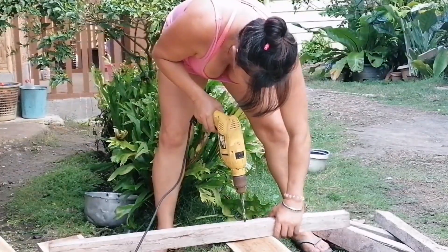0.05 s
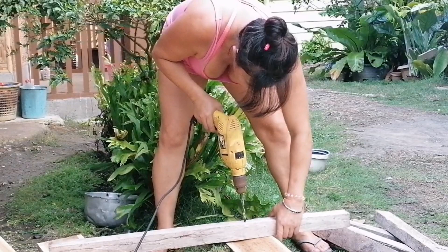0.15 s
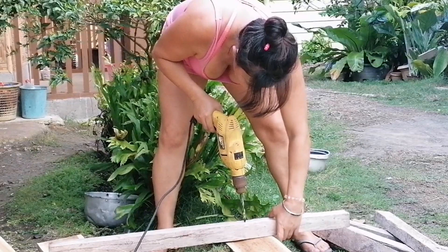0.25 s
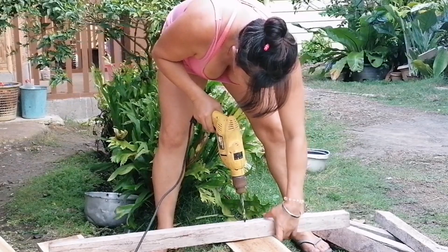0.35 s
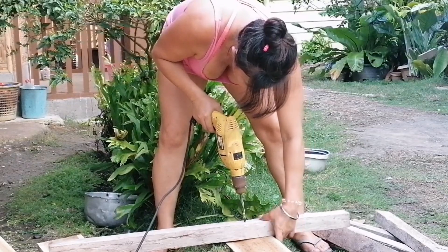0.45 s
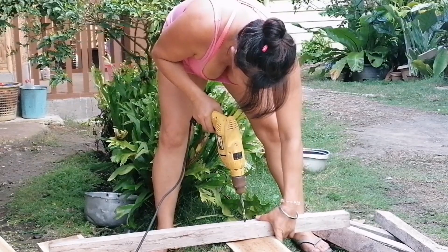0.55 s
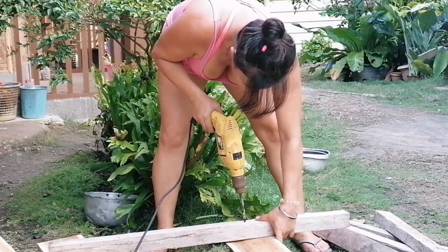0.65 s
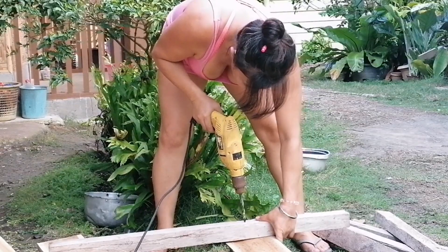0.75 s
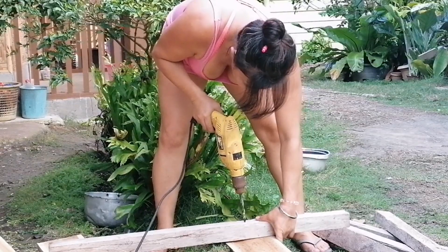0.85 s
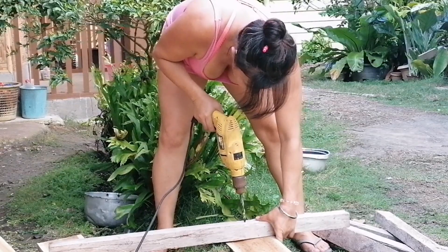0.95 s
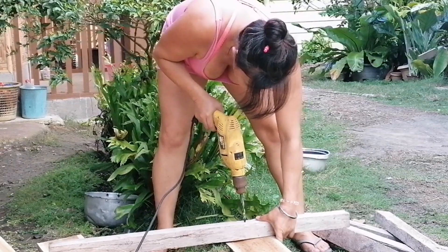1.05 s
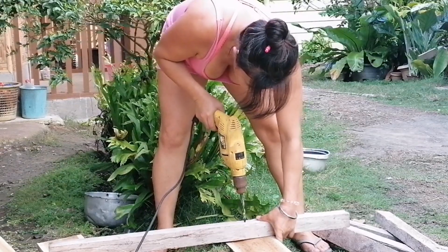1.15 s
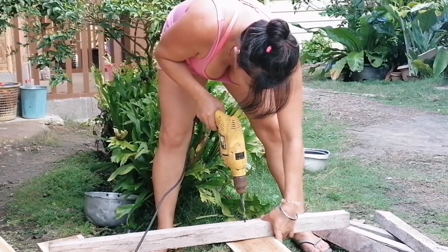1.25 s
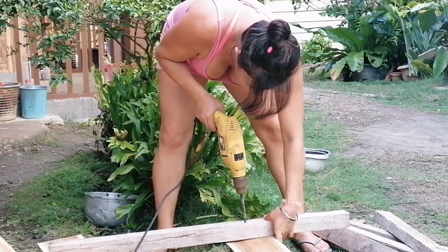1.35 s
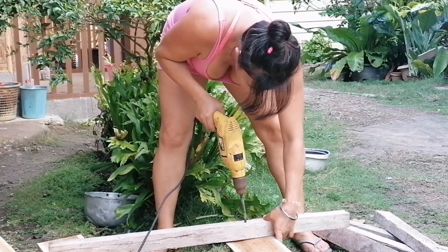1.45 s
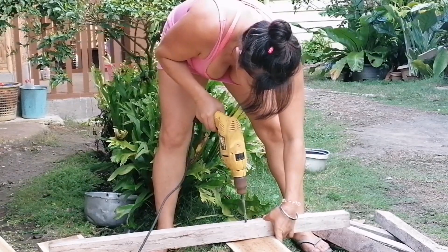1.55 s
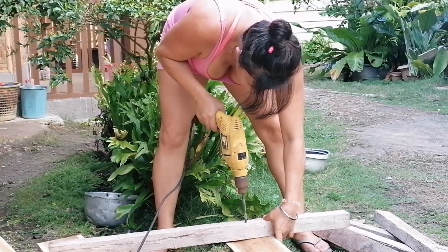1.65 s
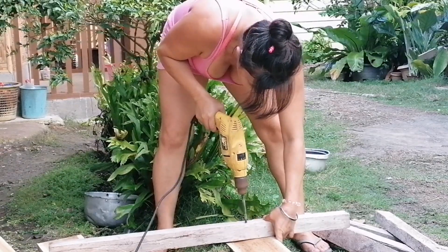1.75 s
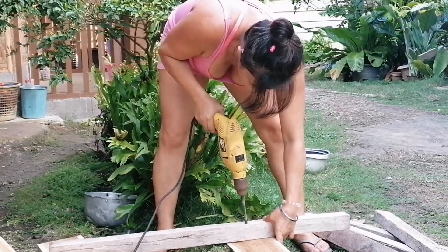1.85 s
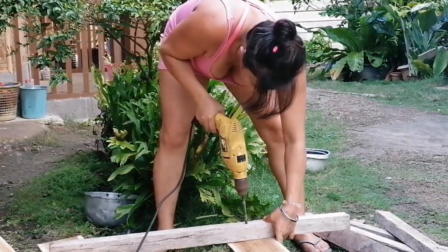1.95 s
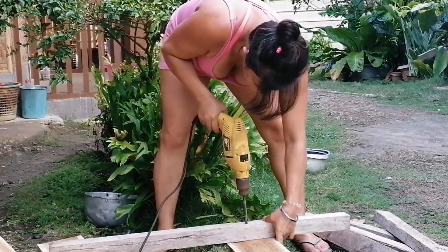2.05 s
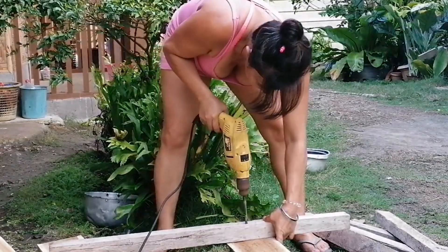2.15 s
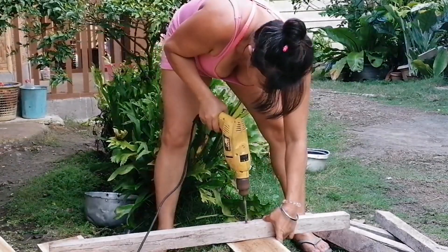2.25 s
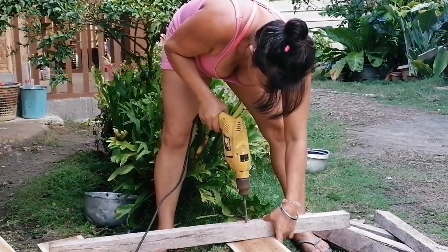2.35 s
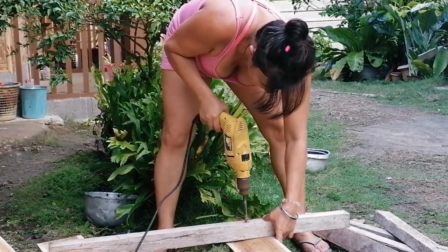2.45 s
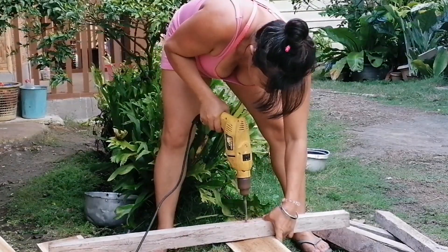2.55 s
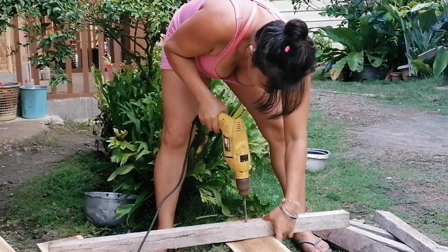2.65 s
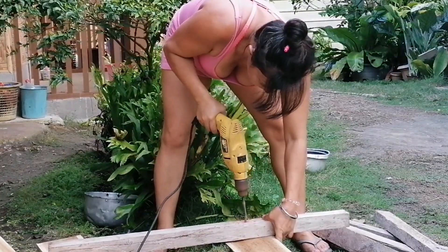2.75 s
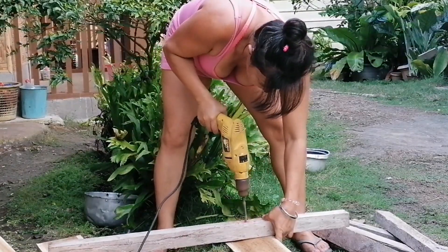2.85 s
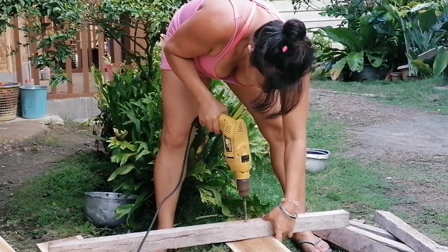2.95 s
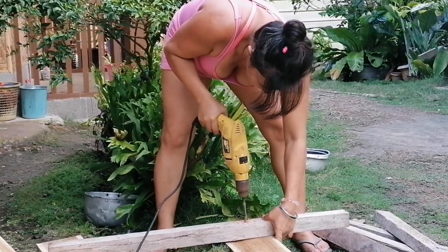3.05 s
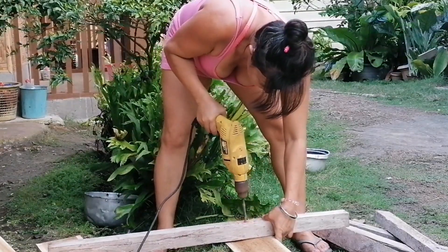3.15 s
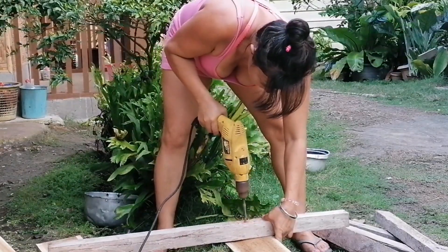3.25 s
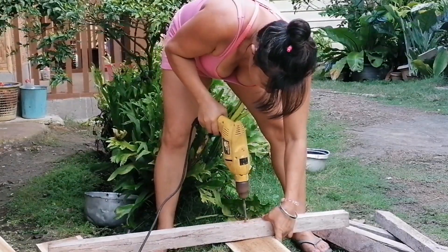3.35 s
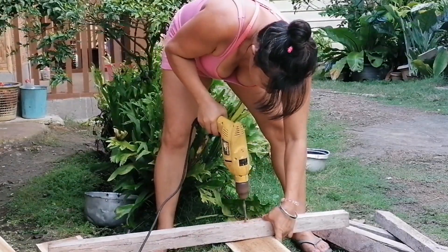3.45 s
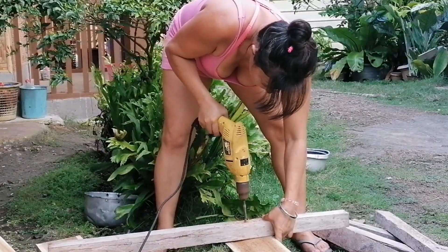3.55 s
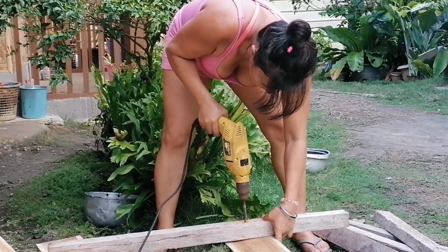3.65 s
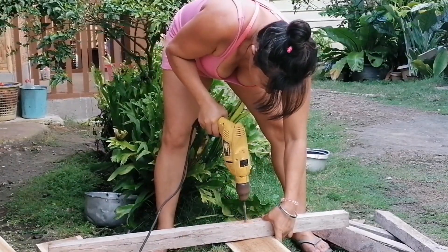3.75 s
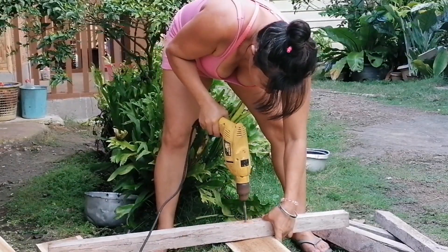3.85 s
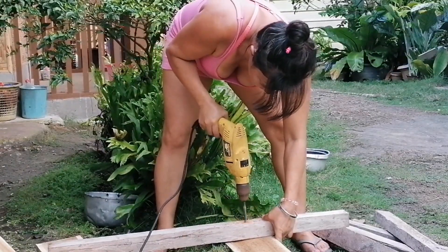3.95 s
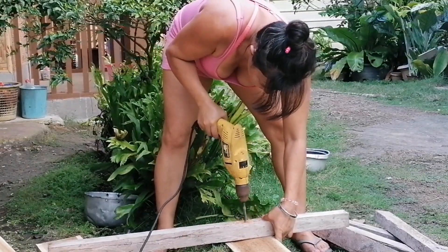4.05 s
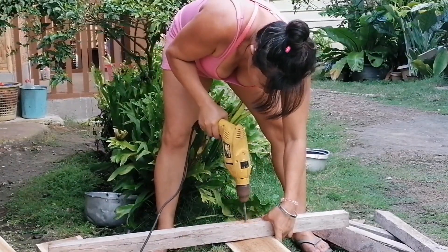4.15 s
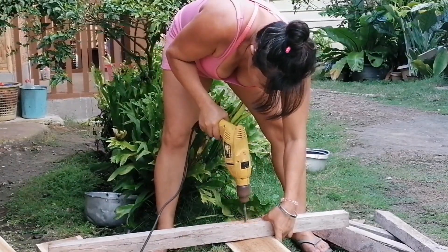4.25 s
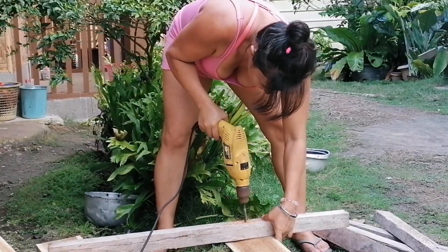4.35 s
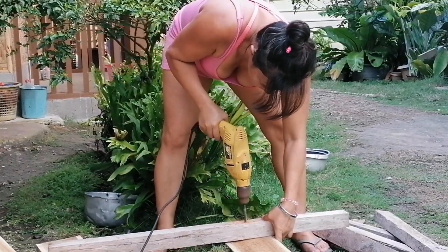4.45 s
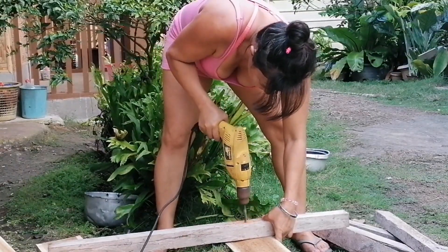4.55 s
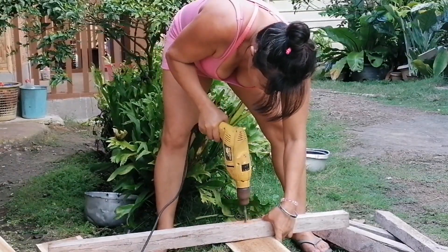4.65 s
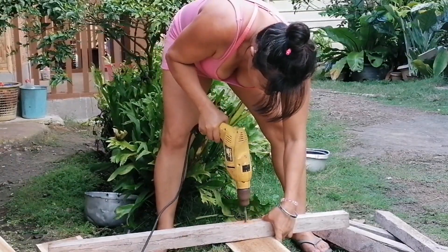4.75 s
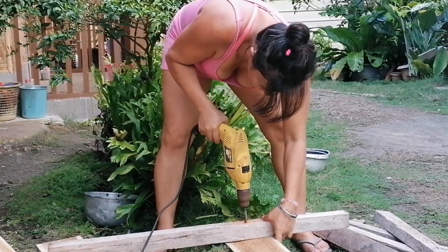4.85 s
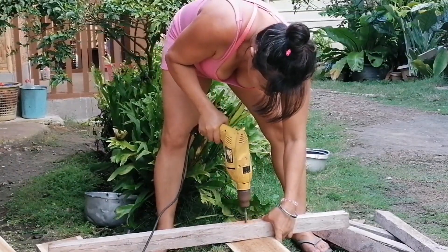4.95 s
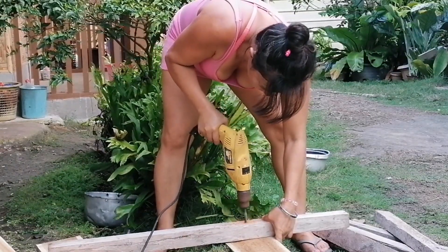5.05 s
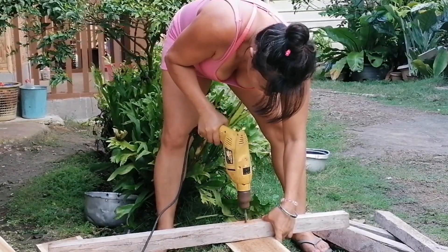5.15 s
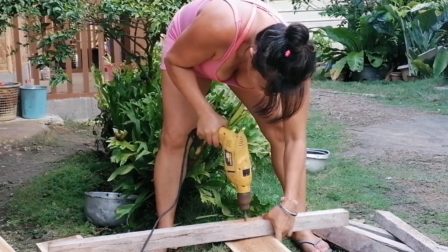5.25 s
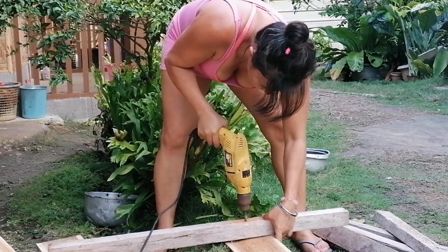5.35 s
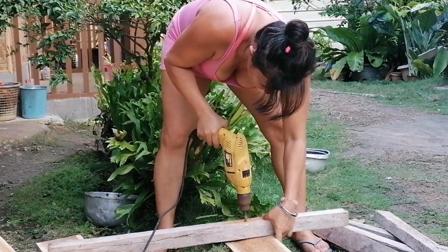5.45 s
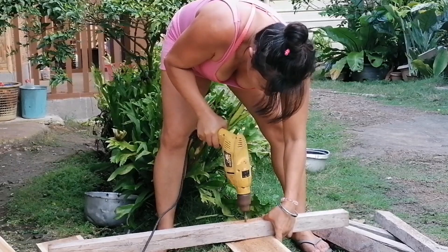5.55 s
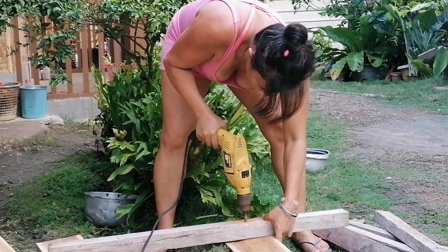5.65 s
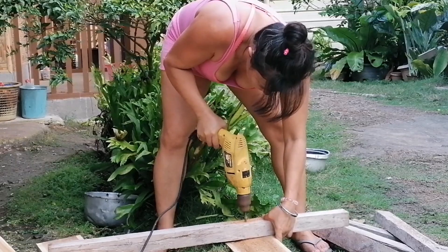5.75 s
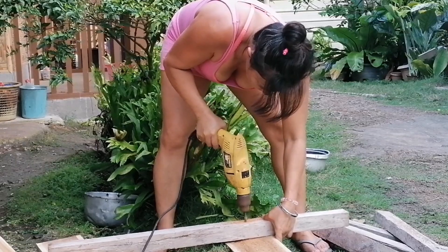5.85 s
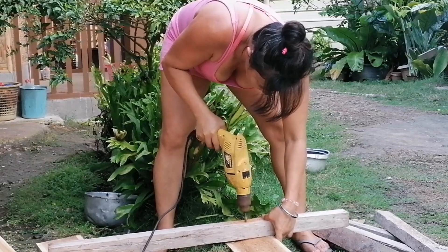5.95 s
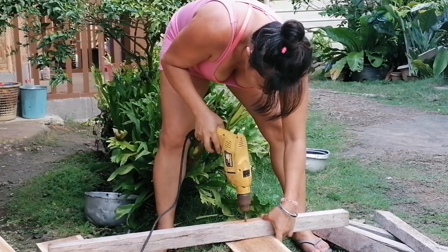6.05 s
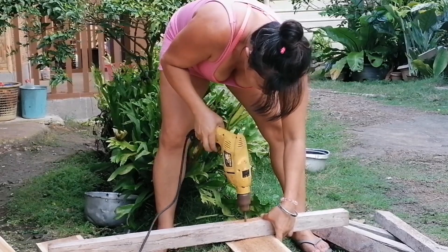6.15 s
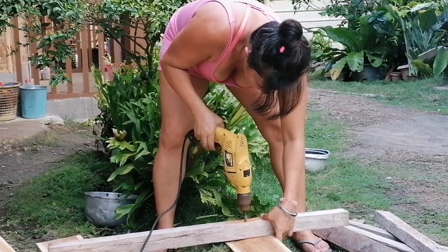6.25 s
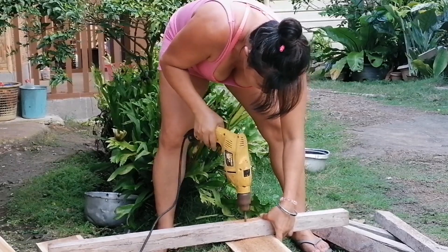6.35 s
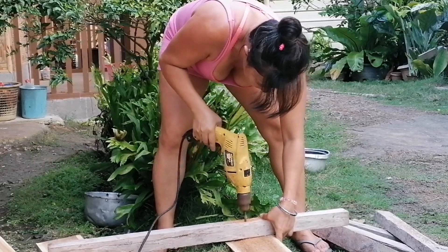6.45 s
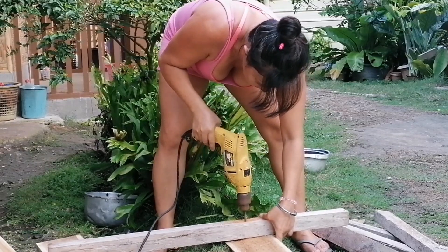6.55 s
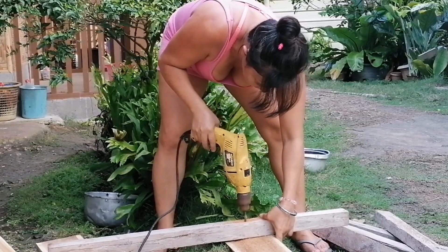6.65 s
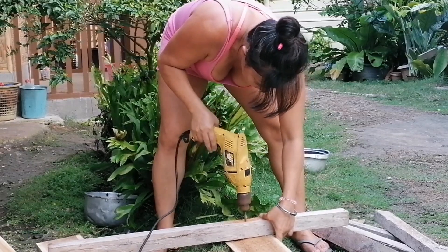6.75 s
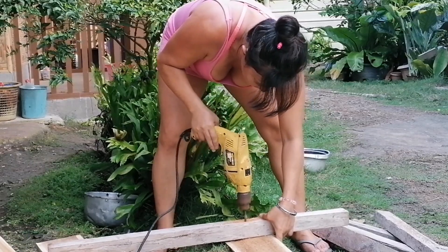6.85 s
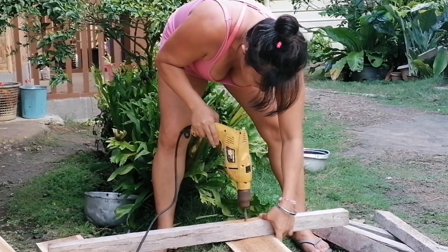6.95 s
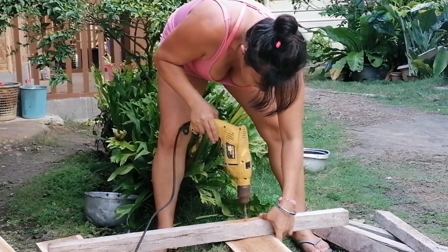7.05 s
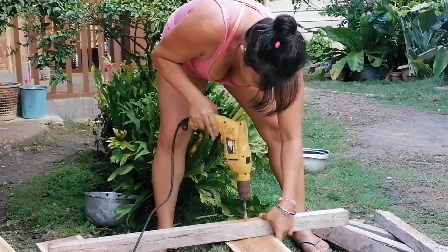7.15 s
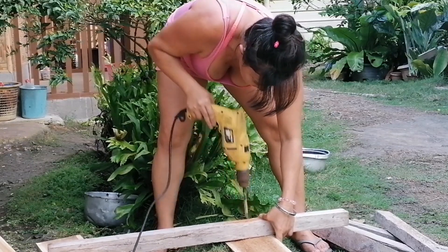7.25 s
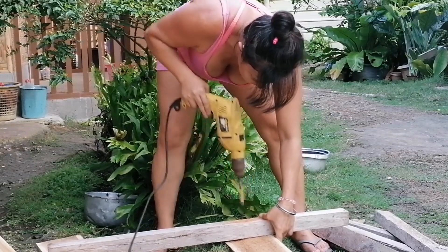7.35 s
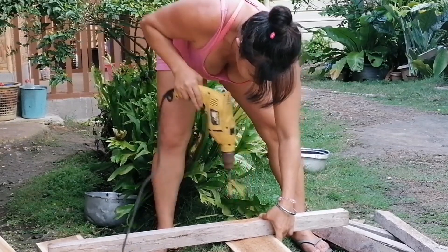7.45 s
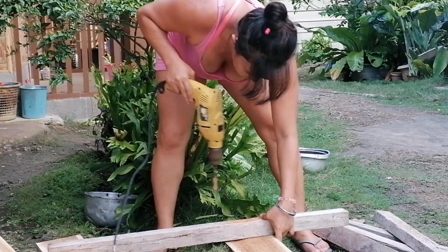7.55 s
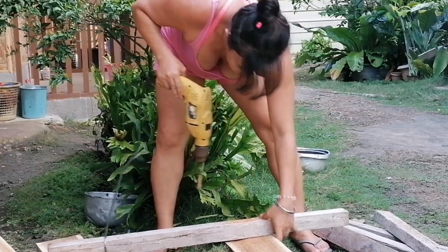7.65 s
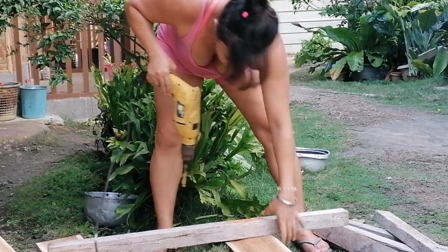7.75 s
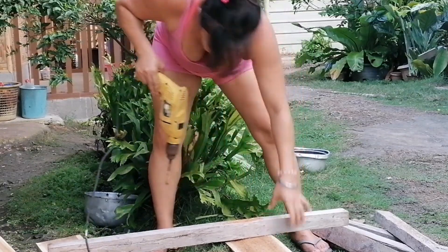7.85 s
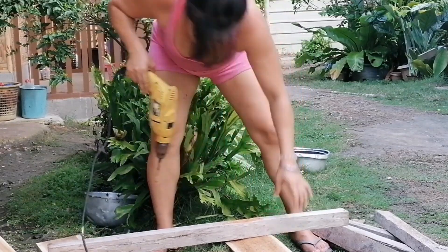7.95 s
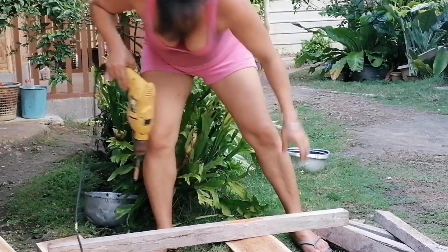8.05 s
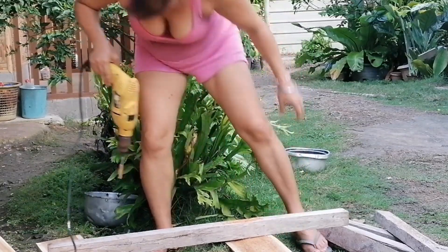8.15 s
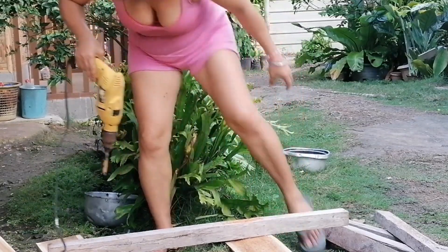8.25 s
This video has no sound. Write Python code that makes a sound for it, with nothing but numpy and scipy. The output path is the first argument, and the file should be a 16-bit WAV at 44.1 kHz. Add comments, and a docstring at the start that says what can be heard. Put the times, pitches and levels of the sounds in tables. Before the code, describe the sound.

Quiet yard at first: distant low rumble, faint leafy hiss, tiny chirps, a soft hollow knock on wood at 0.36 s, a husky rising bird squeak to the right around 0.55-0.75 s, and faint ticks. At 1.4 s a corded drill starts with a rough gear jolt, racing up to near full speed by 2 s. A bright, dense whine with gear rattle, airy fan rush and gritty wood crunch holds, peaking in pitch near 2.5 s, then sagging slowly under load. From 5.4 to 6.1 s the bit breaks through with irregular woody knocks and rapid chatter; pitch dips, then briefly recovers. After 6.1 s the motor coasts steadily downward and fades. A small squeak comes at 7.05 s, light knocks and taps at 7.3-7.6 s, while a thin brush buzz slows over yard rumble, with last faint taps at 8.2 s. Close stereo, short scattered reflections.

```python
"""Distant rumble and faint hiss come first, with small chirps, a knock on the board, ticks and a squeaky bird call.
Then a corded drill in a quiet yard spins up, bores a wooden board, breaks through and coasts down.
Sines at multiples of the rotor speed make the motor and gear tones; shaped noise makes the gear rattle,
cooling air, crunch of the bit, wind and traffic. Damped board modes ring for knocks and chatter,
the brushes buzz as the rotor slows, and soft taps of handling end the scene."""
import sys
import numpy as np
from scipy import signal
from scipy.fft import rfft, irfft, next_fast_len
from scipy.io import wavfile
from scipy.ndimage import uniform_filter1d, map_coordinates

SR = 44100
rng = np.random.default_rng(int(sys.argv[2]) if len(sys.argv) > 2 else 0)


def pcm_store(signal):
    """Save signal as 16-bit PCM."""
    levels = np.round(np.clip(np.atleast_2d(signal), -1, 1) * 32767)
    wavfile.write(sys.argv[1], SR, levels.astype(np.int16).T)


N = 365588

# Noise levels of the drill: (time [s], motor level [dB], bite of the bit in the board [dB])
DRILL = [(1.42, -60, -60), (1.46, -46.5, -47.5), (1.57, -39, -44.5), (1.78, -31, -35.5),
         (2.05, -27.5, -33.5), (2.5, -27.5, -35), (3.0, -28, -35.5), (3.5, -29.5, -37), (4.4, -29.5, -36),
         (4.8, -31.5, -38), (5.3, -31, -38), (5.5, -31.5, -36), (6.1, -30.5, -36.5), (6.3, -32.5, -40.5),
         (6.72, -37, -43.5), (7.08, -43, -50), (7.22, -48, -54), (7.33, -50, -53), (7.45, -52, -64.5),
         (8.29, -56, -78)]
# Rotor speed: (time [s], speed [turns per s])
SPEED = [(1.42, 40), (1.5, 110), (1.62, 209), (1.645, 233), (1.69, 248), (1.72, 266), (1.75, 282),
         (1.81, 312), (1.9, 350.2), (2.0, 377.1), (2.2, 406.2), (2.35, 418.6), (2.5, 425.2), (2.75, 421.4),
         (3.0, 422.2), (3.3, 414.6), (4.2, 398), (4.5, 384.3), (4.82, 377.8), (4.89, 373.5), (4.95, 366.3),
         (5.08, 362.4), (5.14, 358.5), (5.38, 351.2), (5.455, 339.6), (5.68, 353.8), (5.79, 360.2),
         (5.92, 362), (6.11, 371.2), (6.15, 358.5), (6.4, 301.7), (6.7, 244.4), (7.0, 190.8), (7.32, 128.2),
         (7.4, 119.9), (7.7, 92.7), (8.0, 67.2), (8.29, 44)]
# Modes of the wooden board: (frequency [Hz], width [Hz], relative level [dB])
PLANK = [(149, 19, -10.5), (497, 54, 0), (610, 73, 4), (765, 58, 10), (963, 51, 5), (1153, 100, -4),
         (1470, 190, -13)]
FULL_DB = -30  # motor level taken as full work
TOP_HZ = 15740  # upper band limit


def amp(db):
    """Logarithmic level: the amplitude gain of a level in dB."""
    return 10 ** (np.asarray(db) / 20)


def unit(x):
    """Mean power: x scaled to rms 1."""
    return x / np.sqrt(np.mean(x ** 2) + 1e-20)


def along(points, hz):
    """Frequency response: (Hz, value) points interpolated on a logarithmic frequency axis."""
    f, v = np.transpose(points)
    return np.interp(np.log(hz + 1), np.log(f + 1), v)


def curves(rows):
    """Envelopes: one value per sample for each column after the time."""
    s, *cols = np.transpose(rows)
    return [np.interp(np.arange(N) / SR, s, c) for c in cols]


def during(rows):
    """Gating: 1 from the first to the last time of a table, 0 outside."""
    t = np.arange(N) / SR
    return (t >= rows[0][0]) & (t <= rows[-1][0])


def swells(rows):
    """Envelopes: a gain that rises and falls once for each (s, length s, dB) row."""
    t = np.arange(N) / SR
    arch = lambda s, length: np.sin(np.pi * np.clip((t - s) / length, 0, 1))
    return sum(amp(db) * np.sqrt(np.abs(arch(s, length))) for s, length, db in rows)


def wobble(rate):
    """Slow random modulation: a smooth curve through normal random knots, rate knots a second."""
    coarse = np.arange(N + 16, step=16)
    knots = rng.standard_normal(int(N * rate / SR) + 4)
    return np.interp(np.arange(N), coarse, map_coordinates(knots, [coarse * rate / SR]))


def filtered(x, response):
    """Linear filtering: the spectrum of x times a complex response of frequency."""
    m = next_fast_len(N + SR // 2)
    return irfft(rfft(x, m) * response(np.fft.rfftfreq(m, 1 / SR)), m)[..., :N]


def rush(spectrum, lumps=1, alike=None, lifts=(), patchy_db=0):
    """Filtered noise of rms 1 in stereo: lumps modulates both sides alike, lifts are resonances."""
    # Usual coherence: (frequency [Hz], left-right likeness [0-1])
    usual_alike = [(60, 0.89), (120, 1), (240, 0.84), (480, 0.92), (950, 0.75), (1890, 0.577), (3770, 0.3),
                   (7520, 0.5), (10000, 0.45), (15000, 0.7)]
    # Stereo balance: (frequency [Hz], left minus right [dB])
    lean = [(60, 3), (120, -1), (240, 4), (480, -1), (950, 0), (1890, 0.5), (3770, 0), (7520, 0.5),
            (15000, -0.5)]
    alike = usual_alike if alike is None else alike
    z = signal.stft(lumps * rng.standard_normal((2, N)), nperseg=1024)[2]
    # a smoothed random field over frequency and time makes the noise patchy
    field = uniform_filter1d(rng.standard_normal(z.shape[1:]), size=4, axis=0)
    field = uniform_filter1d(field, size=5, axis=1)
    pair = signal.istft(z * amp(patchy_db * unit(field)), nperseg=1024)[1][:, :N]
    inside = lambda hz: (hz > spectrum[0][0]) & (hz < spectrum[-1][0])
    peaks = lambda hz: sum(db / (1 + (2 * (hz - c) / w) ** 2) for c, w, db in lifts)
    shape = lambda hz: inside(hz) * amp(along(spectrum, hz) + peaks(hz))
    # the share of mid and side sets the left-right likeness
    turn = lambda hz: np.arccos(np.clip(along(alike, hz), -1, 1)) / 2
    mid, side = filtered(pair, lambda hz: shape(hz) * [np.cos(turn(hz)), np.sin(turn(hz))])
    sides = np.array([mid + side, mid - side])
    return unit(filtered(sides, lambda hz: amp(np.outer([.5, -.5], along(lean, hz)))))


def tone(turns, db, waver_db, blur, pan_db, wide=0.28):
    """Phase modulation: a sine through turns cycles, blurred, wavering a little differently on each side."""
    phase = 2 * np.pi * (turns + blur * wobble(60) + rng.random())
    sides = np.array([wobble(13), wobble(13)])
    level_db = db + waver_db * wobble(25) + np.array([[.5], [-.5]]) * pan_db
    return np.sqrt(2) * amp(level_db) * np.sin(phase + wide * sides)


def echoes(x, t60):
    """Diffuse reflection: the yard's walls and plants answer with a short scattered tail."""
    t = np.arange(SR // 3) / SR
    tail = rng.standard_normal((2, len(t))) * amp(-60 * t / t60) * (t > .004)
    return signal.fftconvolve(np.atleast_2d(x), tail / np.linalg.norm(tail[0]), axes=1)[:, :N]


def motor_tones():
    """Order tones: unbalance, gear mesh, commutator bars and fan at fixed multiples of the rotor speed."""
    # Cycles per turn: unbalance, gear mesh and overtones, commutator bars, fan blades
    multiples = [1, 4, 8, 12, 16, 20, 24, 31]
    # One row per multiple: (base level [dB], growth [dB per dB of the motor], added by full push [dB],
    # by hard acceleration [dB], by coasting [dB], left minus right [dB])
    tone_rows = [(-40, -0.2, -3.5, -1.5, -5, 6), (-51, -0.87, 14, 2, 0, 4), (-48.5, 1, -5, -33, -17, 2),
                 (-61.5, -0.2, 13, 13.5, 1, 2.5), (-56.5, 1, 16.5, -6, 0, -2), (-60, 2, 13, -2, -17, -2),
                 (-58, .45, -1, -6, 5, 0), (-45, 0.8, 2.5, 8.5, 9.5, -1.5)]
    # Weight on the bit: (time [s], share [0-1])
    push_rows = [(2.5, 0.45), (3.6, 0.46), (4.6, 1), (6.11, 0.99), (6.3, 0)]
    # How well the housing sends out a tone: (frequency [Hz], level [dB])
    radiates = [(150, -59), (260, -15), (400, -10.5), (800, -14), (1250, -3), (1450, 5), (1700, 1.5),
                (2200, -1), (2800, 7), (3300, 7), (3680, -5.5), (3900, -12), (4100, -8), (4600, 3.5),
                (5000, 8), (5450, 7.5), (5620, 2), (6100, -1), (6400, 1), (7100, 7), (8800, -7)]
    # The same for the commutator-bar tone: (frequency [Hz], level [dB])
    airborne = [(1000, -20), (1500, -3), (1900, -3), (2150, 1), (2400, 0), (2600, -4), (2900, -4),
                (3200, -2), (3600, 2), (3900, -6), (4300, -9), (4600, -4), (4850, 4), (5200, -2),
                (5400, 10), (5700, 14), (5950, 7), (6400, -2), (7100, 2), (8800, 0), (13000, 0)]
    # The same for the fan whistle: (frequency [Hz], level [dB])
    vents = [(1000, -45), (3700, -28), (4100, -17), (4400, -10), (4800, -11), (5000, -5), (5300, -4),
             (5600, -7), (6200, -6), (6500, -2), (6750, -5), (7050, 4), (7300, 6), (7600, 1), (8000, 0),
             (8500, 4), (8800, 2), (9350, -4), (9700, -1), (10400, -2), (10800, -6), (11400, -4),
             (11750, 5), (12000, -1), (13000, 1)]
    # Upper gear overtones fall away briefly: (time [s], length [s], depth [dB])
    dropouts = [(5.61, .15, -9), (5.95, .22, -7)]
    off_s, hard_acceleration = 6.11, 460  # trigger released; turns per s per s
    settle_s, unsettled_db = .16, -24  # tones emerge as the rotor settles
    unloaded_s, unloaded_db = 6.95, -36  # gear tones die as the rotor idles slowly
    drift_db, flicker_db = .7, 1.5

    t = np.arange(N) / SR
    speed = curves(SPEED)[0]
    work_db = curves(DRILL)[0] - FULL_DB
    push = curves(push_rows)[0]
    turns = np.cumsum(speed) / SR
    coasting = np.clip((t - off_s) / 0.44, 0, 1)
    idling = np.clip((t - unloaded_s) / .5, 0, 1)
    # hard acceleration shakes the shaft and roughens the gear tones
    acceleration = uniform_filter1d(np.gradient(speed) * SR, size=4000)
    strain = np.clip(acceleration / hard_acceleration, 0, 1)
    shudder = .3 * np.sqrt(strain) * wobble(200)  # cycles
    settling_db = unsettled_db * np.exp(-((t - SPEED[0][0]) / settle_s) ** 2)
    dropout_db = sum(db * swells([(s, length, 0)]) for s, length, db in dropouts)
    out = 0
    for k, (base_db, grows, push_db, strain_db, coast_db, pan_db) in zip(multiples, tone_rows):
        db = base_db + grows * work_db + push_db * push + strain_db * strain + coast_db * coasting
        db += along({24: airborne, 31: vents}.get(k, radiates), k * speed) + settling_db
        db += drift_db * (k > 4) * wobble(8.6)  # comes and goes slowly
        # gear overtones flicker irregularly in level
        db += flicker_db * (4 < k < 24) * (wobble(24) - 1)
        db += unloaded_db * (k < 24) * idling + (12 < k < 24) * dropout_db
        cycles = k * turns + shudder * (k > 1)
        blur = (.0025 + .004 * idling) * k
        out = out + tone(cycles, db, waver_db=1.2 + .03 * k, blur=blur, pan_db=pan_db, wide=.25 + .02 * k)
    return out * during(DRILL)


def motor_noise():
    """Modulated noise through resonances: crunch in the board, rattle of gears and housing, cooling air."""
    # Spectra, each: (frequency [Hz], relative density [dB per Hz])
    board_spectrum = [(130, -56), (220, -21), (320, -11), (381, -17.5), (412, -13), (527, -15.5), (629, -5),
                      (932, 2), (1080, -4), (1280, -2.5), (1390, -4), (1710, -8), (2300, -14), (2990, -15),
                      (5060, -120)]
    thrum_spectrum = [(110, -11), (145, -6), (190, -13.5), (300, -3), (480, -3.5), (600, -2.5), (800, -34)]
    grip_spectrum = [(900, -37), (1150, -9.5), (1290, -1), (1450, -11), (1900, -8.5), (2400, -17.5)]
    gear_spectrum = [(1120, -0.5), (1900, -6.5), (2180, -3), (2600, 0.5), (3090, -1.5), (3310, 1.5),
                     (3880, -4), (4200, -4), (5460, -5.5), (9240, -120)]
    housing_spectrum = [(2350, -42), (4000, -21), (4610, -8), (6610, -4.5), (7220, 1), (7570, -1),
                        (8610, -8.5), (9000, -18.5), (11700, -77), (19800, -120)]
    air_spectrum = [(5060, 7.5), (8600, -2), (8980, 5), (10000, 2.5), (10700, 1), (13600, -2.5),
                    (14900, -2), (15800, -5)]
    ring_spectrum = [(2400, -30), (2500, -1), (2570, 7), (2640, -8), (2800, -30)]
    # Housing modes: (frequency [Hz], width [Hz], lift [dB])
    shell = [(1280, 78, 1), (1857, 155, 4.5), (2570, 74, 4), (3086, 99, 6), (5600, 610, 2), (7310, 180, 4)]
    # The board thrums as the bit breaks through and is pulled out: (time [s], length [s], level [dB])
    thrums = [(5.35, 0.89, -51.5), (6.2, 1.04, -56)]
    # One housing mode sings briefly: (time [s], length [s], level [dB])
    rings = [(1.79, 0.18, -42), (6.22, 0.16, -39.5)]
    mains_kicks = 120  # torque kicks per s, twice the mains frequency
    full_gear_db, gear_grows = -35.5, 1.06  # at full work; dB per dB of the motor
    full_air_db, air_grows = -37, 1.08
    thrum_db, grip_db = -16, -4.5  # relative to the bite
    start_s, start_gear_db, start_grip_db = 0.15, 6, 12.5  # jolt of starting: decay time, extra rattle

    motor_db, bite_db = curves(DRILL)
    work_db = motor_db - FULL_DB
    t = np.arange(N) / SR - DRILL[0][0]
    jolt = np.exp(-np.abs(t) / start_s)
    # from rest every mains half-wave slams the gear teeth; the rotor's inertia soon smooths this
    slam = np.exp(-(t * mains_kicks % 1) * 4) - .22
    kicks = 1 + 4 * amp(-60 * np.abs(t) / 1.6) * slam
    shake = 0.19 * wobble(7) + .5 * wobble(20)  # the hands let the drill shake
    rattle = amp(0.3 * wobble(400) + shake)
    crunch = amp(0.99 * wobble(150) + 0.7 * wobble(12))
    gusty = amp(shake + 1.5 * wobble(8) + 1.2 * wobble(300))
    wood = [(c, w, 4.0 + 0.045 * db) for c, w, db in PLANK] + shell
    gear_db = full_gear_db + gear_grows * work_db + start_gear_db * jolt
    air_db = full_air_db + air_grows * work_db
    thrum = amp(bite_db + thrum_db) + swells(thrums)
    grip = amp(bite_db + grip_db + start_grip_db * jolt)

    out = amp(bite_db) * rush(board_spectrum, crunch, lifts=wood, patchy_db=1.0)
    out += thrum * rush(thrum_spectrum, crunch, patchy_db=3.0)
    out += grip * rush(grip_spectrum, kicks * rattle, patchy_db=2.5)
    gear_lumps = rattle * amp(0.27 * wobble(7.1))
    out += amp(gear_db) * rush(gear_spectrum, gear_lumps, lifts=shell, patchy_db=1.3)
    housing_lumps = rattle * amp(0.33 * wobble(200))
    out += amp(motor_db) * rush(housing_spectrum, housing_lumps, lifts=shell, patchy_db=2.5)
    out += amp(air_db) * rush(air_spectrum, gusty, patchy_db=2.3)
    out += swells(rings) * rush(ring_spectrum, rattle)
    return out * during(DRILL)


def brushes():
    """Periodic impacts: brushes click over the commutator, giving overtones of the slot rate as it slows."""
    # Brush buzz: (time [s], level [dB])
    buzz = [(6.0, -70), (6.9, -63), (7.1, -59), (7.45, -57.5), (7.9, -57), (8.1, -59), (8.29, -66)]
    # Colour of the buzz: (frequency [Hz], level [dB])
    colour = [(2200, -24), (2550, -18), (2800, -9), (3100, -4), (3400, -5), (3650, -16), (4200, -21),
              (4500, -15), (4800, -6), (5300, -4), (5700, 1), (5950, 0), (6350, -10), (6700, -4), (7000, 1),
              (7700, 0), (8100, -3), (8600, -11), (9000, -18), (15800, -26)]
    slots = 12  # armature slots passing the brushes each turn
    loose_hz, loose_blur = 4000, .4  # overtones smear more below this pitch; cycles
    speed = curves(SPEED)[0]
    turns, out = np.cumsum(speed) / SR, 0
    for k in range(3, 16):
        hz = k * slots * speed
        # two bars to a slot make the even overtones stronger
        db = curves(buzz)[0] + along(colour, hz) - 3 * (k % 2) - 6 * (k == 3) + 4.5 * (k == 4)
        # each line comes and goes; the highest are weak
        db += wobble(12) - .7 * max(k - 6, 0) * (1 + (hz < 6500))
        blur = .07 + loose_blur * (hz < loose_hz)
        out = out + (hz < TOP_HZ) * tone(k * slots * turns, db, waver_db=2.2, blur=blur, pan_db=0, wide=.6)
    # out of round, shaken by the gear
    uneven = 1 + .5 * np.sin(2 * np.pi * turns) + 0.235 * np.sin(4 * np.pi * turns)
    uneven += 0.25 * np.sin(8 * np.pi * turns)
    return out * uneven * during(buzz)


def board_knocks():
    """Modal impact response: each knock rings the board's modes as decaying sines."""
    # Bit catching or knocking the board: (time [s], peak level [dB], favoured pitch [Hz])
    hits = [(0.364, -36, 880), (5.431, -27, 760), (5.508, -29, 760), (5.577, -23, 960), (5.628, -27, 780),
            (5.655, -26, 700), (5.697, -25, 770), (5.725, -23, 940), (5.818, -23, 750), (5.84, -21, 750),
            (5.883, -25, 740), (5.913, -22, 950), (5.94, -20, 950), (6.041, -27, 960), (6.091, -26, 790),
            (7.295, -40, 770), (7.324, -37, 680)]
    favour_db = 30  # weakening of a mode per octave from the favoured pitch
    out, t = np.zeros(N + SR), np.arange(SR // 5) / SR
    for (s, db, hz), luck in zip(hits, rng.standard_normal((len(hits), len(PLANK)))):
        ring = 0
        for (c, w, _), r in zip(PLANK, luck):
            gain = amp(-favour_db * abs(np.log2(c / hz)) + 4.5 * r)
            ring = ring + gain * np.exp(-np.pi * w * t) * np.sin(2 * np.pi * c * t)
        ring = ring * (1 - np.exp(-t / .0007))  # soft onset
        out[round(s * SR):][:len(t)] += amp(db) * ring / np.abs(ring).max()
    return out[:N]


def bit_chatter():
    """Repeated excitation of resonances: a jittered train of grabs drives the board's modes."""
    # The bit grabs as it breaks through: (time [s], length [s], level [dB])
    grab_swells = [(5.4, .2, -45), (5.62, 0.14, -40), (5.8, 0.16, -39), (5.98, 0.14, -42),
                   (6.14, 0.054, -56)]
    grab_hz = 153.8  # mean grabs per s

    def wood(f):
        """Modal superposition: resonances of the board with alternating sign."""
        modes = enumerate(PLANK)
        return sum((-1) ** k * amp(db) * 1j * f * w / (c * c - f * f + 1j * f * w) for k, (c, w, db) in modes)

    cycles = np.cumsum(grab_hz * (1 + .07 * wobble(30))) / SR
    grabs = np.diff(np.floor(cycles), prepend=0) * amp(4.7 * wobble(150))
    return swells(grab_swells) * amp(1.7 * wobble(35)) * unit(filtered(grabs, wood))


def bit_squeak():
    """Friction tone: a blurred sine tied to the rotor speed swells and fades."""
    # The bit rubs out of the hole and loads the gears: (time [s], length [s], level [dB])
    rubs = [(7.005, .035, -47.5), (7.058, 0.039, -40.5), (7.115, 0.037, -46)]
    turns = np.cumsum(curves(SPEED)[0]) / SR
    return swells(rubs) * tone(8.1 * turns, 0, waver_db=4.5, blur=0.18, pan_db=-1)


def board():
    """Direct and reflected sound: knocks and chatter with their echoes, and the dry squeak of the bit."""
    struck = board_knocks() + bit_chatter()
    return struck + amp(-5.0) * echoes(struck, t60=0.26) + bit_squeak()


def taps():
    """Heavily damped impacts: dull sine bursts as the hands let go of drill and board."""
    # Soft handling taps: (time [s], peak level [dB], frequency [Hz])
    tap_rows = [(7.27, -50, 1500), (7.297, -48, 1500), (7.312, -49, 1000), (7.333, -49, 1400),
                (7.35, -50, 1500), (7.361, -45, 1500), (7.47, -56, 1250), (7.531, -55, 1300),
                (7.561, -50, 1400), (7.612, -56, 1350), (8.182, -54, 1400), (8.192, -58, 1450),
                (8.204, -55, 1400)]
    tap_s = 0.01  # length of a tap
    out, u = np.zeros(N), np.arange(round(tap_s * SR)) / (tap_s * SR)
    for s, db, hz in tap_rows:
        burst = np.sin(np.pi * u) ** 2 * np.sin(2 * np.pi * hz * tap_s * u)
        out[round(s * SR):][:len(u)] += amp(db) * burst
    return out + amp(-6) * echoes(out, t60=.15)


def ticks():
    """Broadband transients: short decaying noise bursts, coloured bright."""
    # Light clicks: (time [s], level before trim and colouring [dB])
    clicks = [(0.3825, -54.5), (1.0784, -45.5), (1.4217, -48)]
    out, t = np.zeros((2, N)), np.arange(SR // 20) / SR
    for s, db in clicks:
        burst = amp(db - 2.5 - 60 * t / .02) * rng.standard_normal(len(t))
        out[:, round(s * SR):][:, :len(t)] += burst
    bright = [(1000, -20), (4000, -16), (7500, 14.5), (10000, -14), (13000, -24)]  # Hz, dB
    out = filtered(out, lambda hz: amp(along(bright, hz)))
    return out + amp(-1.5) * echoes(out, t60=.2)


def birds():
    """Frequency modulation: a rising husky whistle to the right and faint short chirps, smeared by echoes."""
    # Squeaky call: (time [s], frequency [Hz], level [dB])
    call = [(.45, 5950, -75.5), (.54, 6760, -60), (.556, 6880, -51), (.6, 6840, -48.5), (.68, 7220, -51.5),
            (.78, 7240, -67), (.82, 7300, -78)]
    # Small chirps: (time [s], length [s], start frequency [Hz], end frequency [Hz], peak level [dB])
    chirp_rows = [(.35, .04, 2000, 2450, -60), (.56, .08, 3350, 3400, -67), (.58, .05, 2300, 2150, -65),
                  (.925, .045, 2050, 2450, -61), (1.07, .02, 1750, 1900, -65)]
    hz, call_db = curves(call)
    husk = np.interp(np.arange(N) / SR, [.6, .7], [.08, .22])  # cycles; the note grows hoarse at its top
    phase = np.cumsum(hz) / SR + husk * wobble(300)
    out = tone(phase, call_db + 3 * wobble(200), waver_db=1.0, blur=0.06, pan_db=-6.0) * during(call)
    for s, length, from_hz, to_hz, db in chirp_rows:
        u = np.arange(round(length * SR)) / (length * SR)
        glide = from_hz + (to_hz - from_hz) * np.sqrt(u)
        glide = glide + 350 * rng.standard_normal(len(u))  # random jitter of the pitch
        chirp = np.sin(np.pi * u) * np.sin(2 * np.pi * np.cumsum(glide) / SR)
        out[:, round(s * SR):][:, :len(u)] += amp(db) * chirp
    return out + amp(-2) * echoes(out, t60=.3)


def yard():
    """Diffuse-field noise: wind rumble, far traffic, a far engine and a faint hiss of leaves and insects."""
    # Levels: (time [s], level [dB])
    wind = [(0, -64), (.9, -73), (1.15, -50), (1.5, -69), (3, -71.5), (6, -79), (6.7, -54), (7.3, -72),
            (7.9, -65.5), (8.29, -64)]
    road = [(0, -54.5), (1.4, -54), (2, -65), (3, -64.5), (5.6, -56.5), (6.4, -64), (7.1, -57.5),
            (8.29, -58)]
    # Swells of the far engine: (time [s], length [s], level [dB])
    hum = [(2.85, 1.0, -59), (4.45, 0.31, -63), (7.15, 0.74, -62)]
    # Spectra, each: (frequency [Hz], relative density [dB per Hz])
    gust_spectrum = [(15, -10), (25, 1), (45, -5), (70, -22)]
    traffic_spectrum = [(26, -38), (45, 1), (110, 1), (287, -10), (500, -21), (650, -50), (1100, -120)]
    hum_spectrum = [(60, -39), (73, 8), (81, -17), (90, 0), (105, -38)]
    hiss_spectrum = [(180, -48), (300, -13), (654, -10), (747, -12), (1010, -14), (1380, -19.5),
                     (1680, -17.5), (1830, -19.5), (3060, -15.5), (4260, -21), (5200, -16), (9450, -29),
                     (15800, -40)]
    # Coherence in the yard: (frequency [Hz], left-right likeness [0-1])
    diffuse = [(60, 0.83), (150, 0.88), (380, 0.62), (950, 0.01), (2380, 0.05), (5980, 0.3), (15000, 0.97)]
    out = amp(curves(wind)[0]) * rush(gust_spectrum, amp(2.3 * wobble(3.9)), diffuse)
    out += amp(curves(road)[0]) * rush(traffic_spectrum, amp(0.98 * wobble(4.18)), diffuse)
    out += swells(hum) * rush(hum_spectrum)
    out += amp(-62) * rush(hiss_spectrum, amp(0.6 * wobble(1.5)), diffuse, patchy_db=3.0)
    return out


def scene():
    """Superposition: drill, board, handling, birds and yard add up in stereo."""
    drill = motor_tones() + motor_noise() + brushes()
    return drill + board() + taps() + ticks() + birds() + yard()


def record(dry):
    """Band limiting: nothing at or above the upper limit passes."""
    return filtered(dry, lambda hz: hz < TOP_HZ)


dry = scene()
out = record(dry)
pcm_store(out)
```